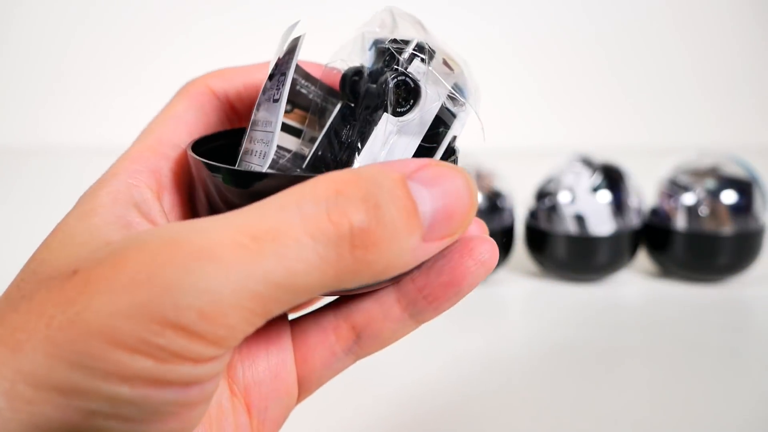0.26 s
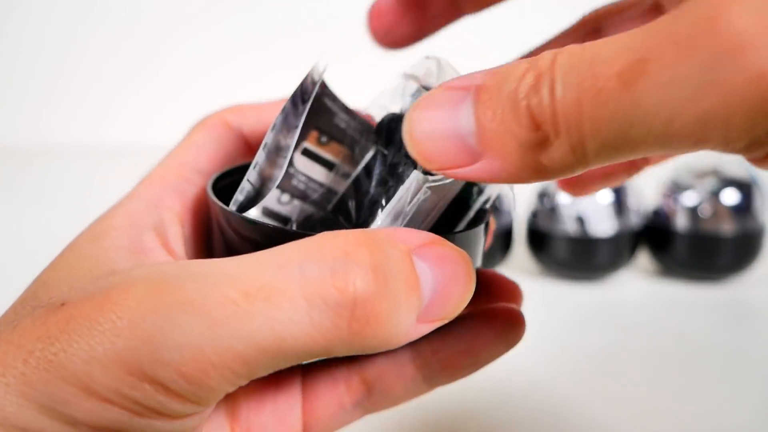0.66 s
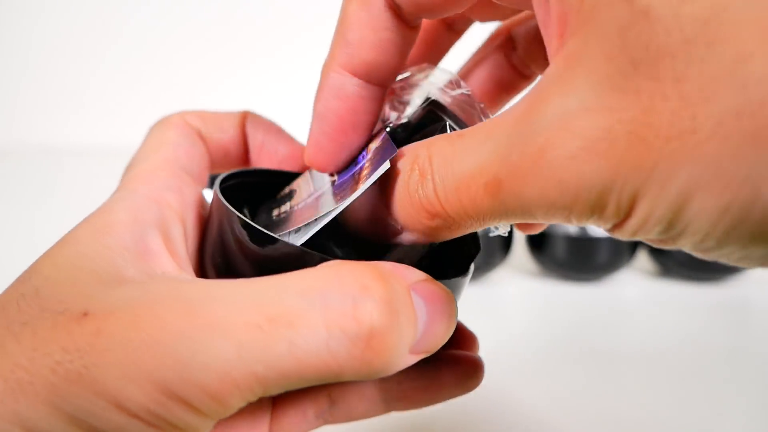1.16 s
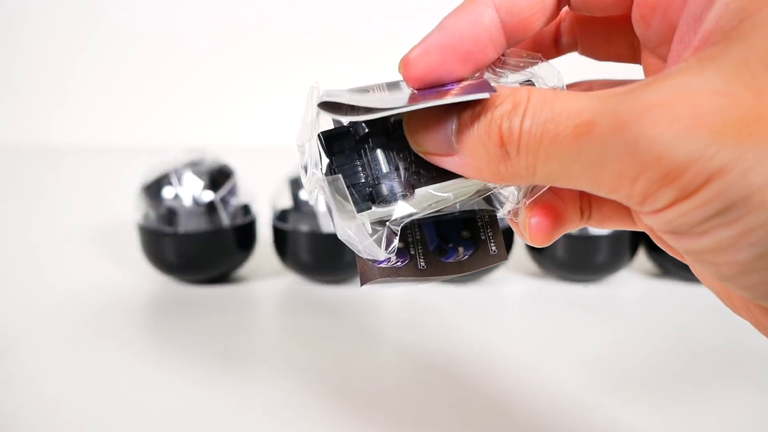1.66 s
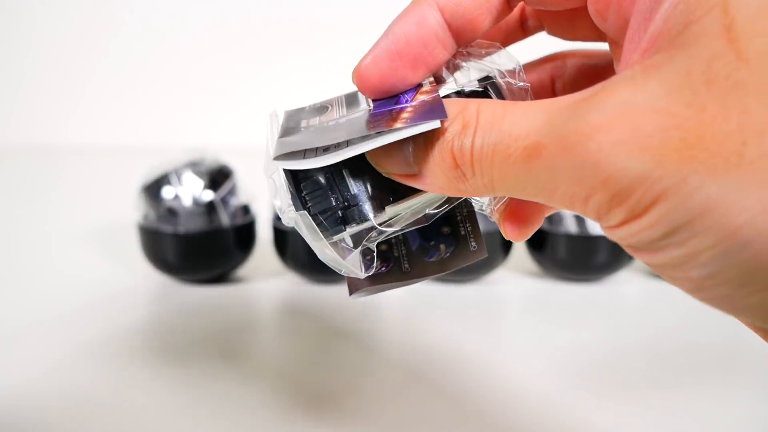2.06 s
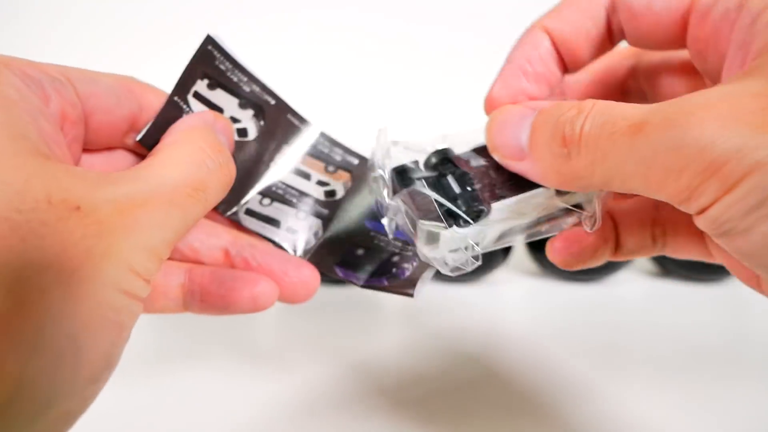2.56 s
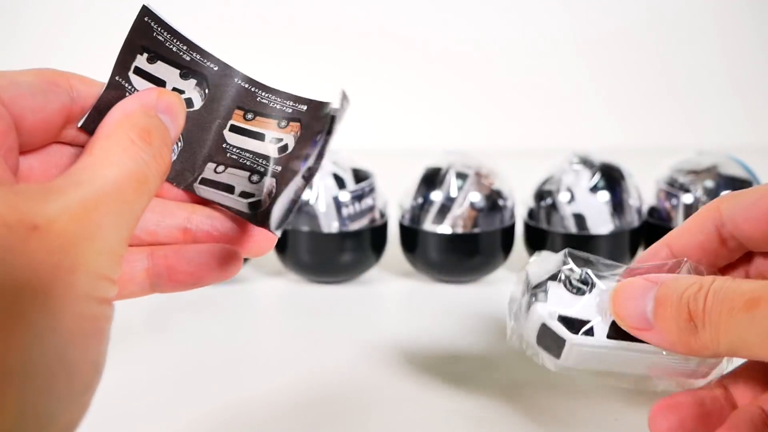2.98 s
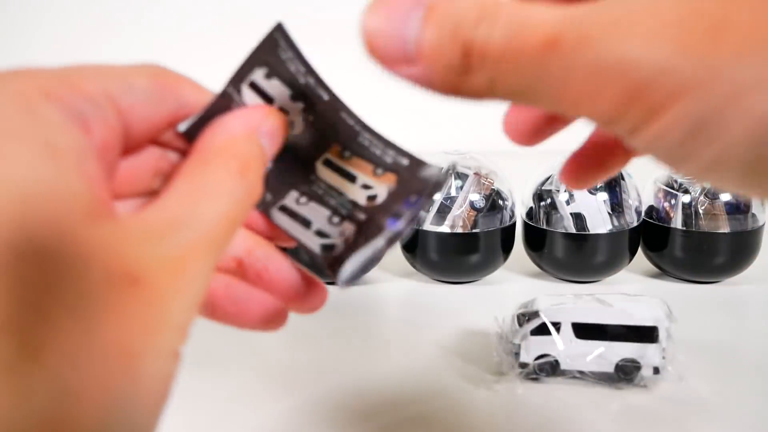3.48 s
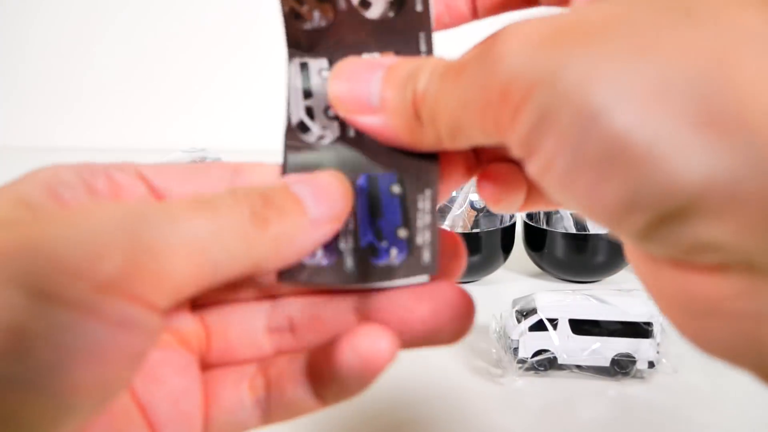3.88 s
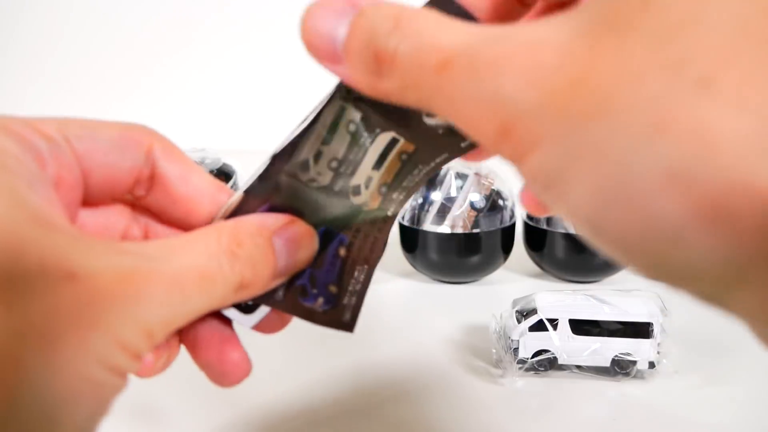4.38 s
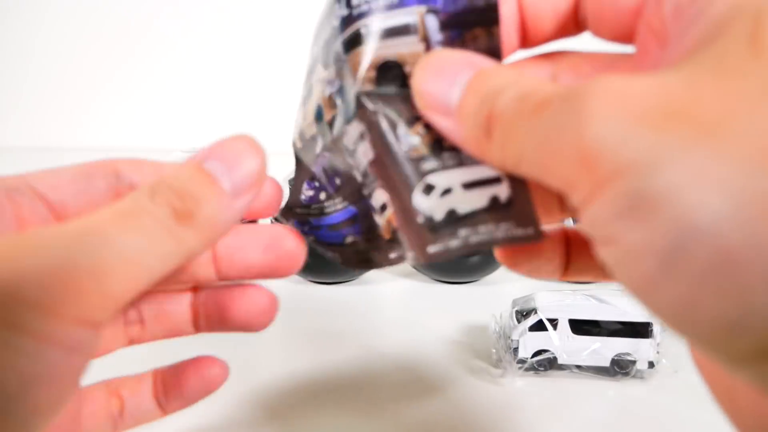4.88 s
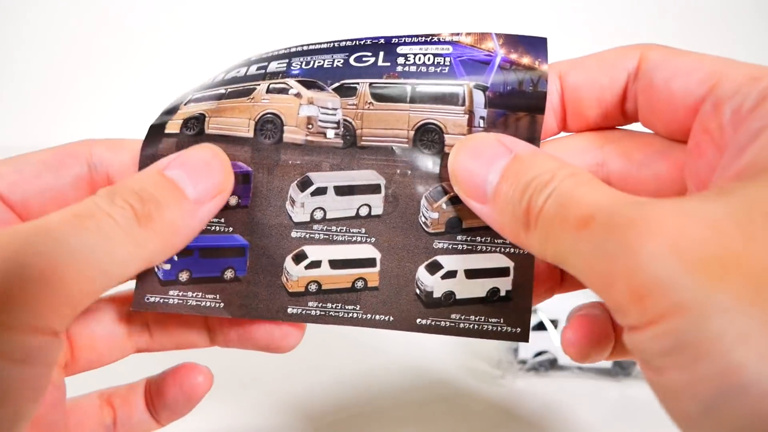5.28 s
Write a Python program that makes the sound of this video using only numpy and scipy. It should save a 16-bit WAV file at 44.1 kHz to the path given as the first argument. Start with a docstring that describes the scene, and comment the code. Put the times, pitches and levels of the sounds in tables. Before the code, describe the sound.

Hands unpack a plastic toy capsule close to the microphone in a small room, over a faint ventilation hum. After a light rustle, a thin lid lands on a table at about 0.3 seconds with a loud, sharp clack and a tiny bounce. From 0.6 to 1.4 seconds a wrapped toy scrapes and clicks against the inside of the cup. A few dry ticks of film follow. At 1.8 seconds the cup hits the table with a loud, hollow knock, then rocks softly until 2.2. From 2.3 to 3.7 seconds plastic wrap crinkles brightly and unevenly, with a few tiny finger squeaks and the first paper snaps. From 3.8 seconds a folded leaflet slides over skin and cracks at its creases, sharply at 4.0 and most busily around 4.7 to 5.0. It flaps open with low puffs of air, snapping lightly until about 5.6 seconds.

```python
"""A plastic lid clacks down on a table as a toy capsule is unpacked, close up in a small room.
The wrapped toy scrapes and knocks its way out of the cup, and the cup knocks on the table and rocks.
Then the plastic wrap crinkles, and a folded paper leaflet slides, snaps and flaps open.
Lid and cup ring as hard shells; creases flip with a tick and shake the panel around them;
sliding is a swarm of tiny slips. Ventilation hums faintly underneath."""
import sys
import numpy as np
from scipy import signal
from scipy.fft import rfft, irfft, next_fast_len
from scipy.io import wavfile
from scipy.ndimage import map_coordinates

SR = 44100
rng = np.random.default_rng(int(sys.argv[2]) if len(sys.argv) > 2 else 0)


def to_wav(sig):
    """Store sig (one row per channel, or 1-D mono) as 16-bit WAV at the path in sys.argv[1].

    Samples outside -1..1 are clipped; the rate is SR.
    """
    pcm = np.clip(np.atleast_2d(sig), -1, 1) * 32767
    pcm = np.round(pcm).astype(np.int16)
    wavfile.write(sys.argv[1], SR, pcm.T)  # frames by channels


N = 244314
WRAP_START_S, PAPER_START_S, END_S = 2.26, 3.81, 5.6


def amp(db):
    """Decibels to gain."""
    return 10 ** (np.asarray(db) / 20)


def unit(x):
    """Scale to rms 1."""
    return x / np.sqrt(np.mean(x ** 2) + 1e-20)


def burst(x):
    """Scale each row to the energy of one millisecond at rms 1."""
    return x * np.sqrt(SR / 1000 / (np.sum(x ** 2, axis=-1, keepdims=True) + 1e-20))


def along(points, hz):
    """Read (Hz, value) points on a log frequency axis."""
    point_hz, values = np.transpose(points)
    return np.interp(np.log(hz + 1), np.log(point_hz + 1), values)


def envelope(times, values):
    """Join timed points into one value per sample."""
    return np.interp(np.arange(N) / SR, times, values)


def wobble(rate, n):
    """A smooth random curve of n samples, rate knots a second."""
    knots = rng.standard_normal(int(n * rate / SR) + 4)
    return map_coordinates(knots, [np.arange(n) * rate / SR])


def filtered(x, response):
    """Filter x by a complex response of frequency."""
    n = x.shape[-1]
    size = next_fast_len(n + min(n, SR // 4), True)
    return irfft(rfft(x, size) * response(np.fft.rfftfreq(size, 1 / SR)), size)[..., :n]


def coloured(x, colour, size=1024):
    """Minimum-phase filter with a (Hz, dB) colour: nothing rings ahead of an attack."""
    cepstrum = irfft(np.log(amp(along(colour, np.fft.rfftfreq(size, 1 / SR)))))
    cepstrum[1:size // 2] *= 2
    cepstrum[size // 2 + 1:] = 0
    kernel = irfft(np.exp(rfft(cepstrum))).reshape((1,) * (x.ndim - 1) + (-1,))
    return signal.fftconvolve(x, kernel, axes=-1)[..., :x.shape[-1]]


def noise(colour):
    """Steady noise of rms 1 with a (Hz, dB) colour."""
    return unit(filtered(rng.standard_normal(N), lambda f: amp(along(colour, f))))


def resonance(f, hz, width_hz):
    """The response of one damped mode."""
    return 1j * f * width_hz / (hz * hz - f * f + 1j * f * width_hz)


def ring(rows, hz, width, order=1):
    """Each row excites its own mode; width is a fraction of the pitch."""
    return filtered(rows, lambda f: resonance(f, hz[:, None], width * hz[:, None]) ** order)


def jolts(t60, chatter, size=4096):
    """One row per contact: a sharp impulse and the chatter that dies after it."""
    t = np.arange(size) / SR
    tail = rng.standard_normal((len(t60), size)) * amp(-60 * t / np.maximum(t60, 1e-3)[:, None])
    return burst(1. * (t == 0)) + chatter * burst(tail)


def placed(times, sounds):
    """Sum rows of sound at their start times."""
    index = np.round(np.asarray(times) * SR).astype(int)[:, None] + np.arange(sounds.shape[1])
    return np.bincount(np.maximum(index, 0).ravel(), sounds.ravel(), N)[:N]


def room_tone():
    """The steady, bass-heavy noise of the quiet room."""
    # noise floor colour: freq_hz, level_db
    colour = [(20, 10), (60, -15), (84, -2), (105, -38), (130, 1), (200, -9.5), (500, -11.5), (1500, -19.5),
              (4000, -22), (9000, -20), (16000, -55)]
    return noise(colour)


def ventilation():
    """Low ventilation tones that waver in pitch and level."""
    # hum tones: pitch_hz, level_db
    tones = [(82, -62.5), (126, -61.5)]
    t = np.arange(N) / SR
    hum = np.zeros(N)
    for hz, db in tones:
        peak = np.sqrt(2) * amp(db + 1.4 * wobble(5.78, N))
        hum += peak * np.sin(2 * np.pi * hz * t + wobble(3.8, N))
    return hum


def room_reverb(x, size=8192):
    """The small room's short tail, drawn afresh for each block so that no fixed pitch rings."""
    # room decay: freq_hz, t60_s
    decay = [(150, 0.37), (500, 0.17), (1200, 0.21), (3000, 0.24), (8000, 0.23), (15000, 0.24)]
    blocks = np.pad(x, (0, -N % size)).reshape(-1, 1, size)
    hz, t, spectra = signal.stft(rng.standard_normal((len(blocks), 2, size)), SR, nperseg=256)
    spectra *= amp(-60 * t / along(decay, hz)[:, None])
    tail = signal.istft(spectra, SR, nperseg=256)[1][..., :size]
    tail *= np.clip(np.arange(size) / SR / .002 - 1, 0, 1)  # first reflections after 2 ms
    tail /= np.linalg.norm(tail, axis=-1, keepdims=True)
    wet = signal.fftconvolve(blocks, tail, axes=-1)
    starts = np.arange(len(blocks)) * size / SR
    return np.array([placed(starts, channel) for channel in wet.transpose(1, 0, 2)])


def stirred_air():
    """Hands and leaflet stir the air into a low rumble."""
    # air movement: time_s, level_db
    gusts = [(0.0, -52.5), (0.21, -62), (0.29, -44), (0.34, -58.5), (2.28, -54), (2.31, -51), (2.36, -51),
             (2.96, -61.5), (4.15, -46), (4.18, -49), (4.43, -60), (4.84, -34.5), (4.92, -48),
             (4.98, -29.5), (5.06, -60), (5.2, -35), (5.25, -49), (5.54, -33)]
    # rumble colour: freq_hz, level_db
    colour = [(10, -13), (35, -2), (70, 2.5), (130, -18), (250, -12.5), (600, -72)]
    times, db = np.transpose(gusts)
    return amp(envelope(times, db) - 1) * noise(colour)


def pushes(rows, width):
    """Soft, quickly damped pushes of air."""
    starts, db, hz, t60 = np.transpose(rows)
    push = ring(jolts(t60, chatter=0.9), hz, width, order=2)
    return placed(starts, amp(db)[:, None] * burst(push))


def bumps():
    """Table, toy and hands bump dully."""
    # thuds: start_s, level_db, pitch_hz, t60_s
    thuds = [(.288, -21, 128, 0.19), (1.12, -25, 465, 0.034), (2.3, -27.5, 58, 0.089)]
    return pushes(thuds, width=0.76)


def finger_strokes(release_db=26):
    """Body and hiss envelopes in dB: strokes swell as the fingers press and die as they ease off."""
    # finger moves: start_s, rise_s, fall_s, body_db, hiss_db
    strokes = [(-0.03, 0.11, 0.099, -40, -46), (0.11, .03, 0.035, -39, -43.5),
               (0.34, 0.059, 0.06, -49, -62), (0.55, 0.068, 0.021, -45.5, -47),
               (0.708, 0.063, 0.27, -29.5, -30.5), (0.88, 0.085, 0.06, -28, -31),
               (1.078, 0.028, 0.096, -22, -24), (1.141, 0.097, 0.24, -30, -37.5), (1.6, 0.1, .15, -74, -55),
               (2.04, 0.038, 0.17, -45, -46.5), (2.282, 0.013, 0.11, -38, -32),
               (2.335, 0.069, 0.16, -38, -32), (2.41, 0.077, 0.1, -38.5, -31),
               (2.583, 0.012, 0.12, -29, -25.5), (2.69, 0.048, 0.22, -37.5, -33.5),
               (2.86, 0.035, 0.39, -40, -37.5), (3.035, 0.05, 0.088, -35.5, -29),
               (3.13, 0.041, 0.13, -31.5, -30), (3.281, 0.05, 0.15, -36, -33),
               (3.455, 0.049, 0.12, -30.5, -27.5), (3.53, 0.034, 0.16, -37, -35),
               (3.6, 0.068, 0.18, -41.5, -34.5), (3.835, 0.023, 0.056, -43, -35.5),
               (3.93, 0.17, 0.22, -41.5, -36), (4.11, 0.075, 0.23, -33.5, -27.5),
               (4.33, 0.084, 0.02, -35.5, -26.5), (4.508, 0.026, 0.088, -43, -31),
               (4.56, 0.1, 0.18, -36, -31.5), (4.75, 0.027, 0.6, -42, -38),
               (4.92, 0.047, 0.059, -30.5, -33), (5.148, 0.01, 0.075, -35.5, -34),
               (5.255, 0.069, 0.6, -40, -42), (5.39, 0.14, 0.55, -51, -42)]
    t = np.arange(0, END_S, .001)
    body, hiss = amp(-69.5) ** 2, amp(-69) ** 2  # fingers holding still rustle faintly
    for start, rise, fall, body_db, hiss_db in strokes:
        press = np.clip((t - start) / rise, 0, 1) ** 0.67
        lift = np.clip((t - start - rise) / fall, 0, 10) ** 1.05  # steepens as the fingers lift off
        power = (press * amp(-release_db * lift)) ** 2
        body += power * amp(body_db) ** 2
        hiss += power * amp(hiss_db) ** 2
    return np.array([envelope(t, 10 * np.log10(band)) for band in (body, hiss)])


def bending(x, depth_db):
    """The sheet's resonances come and go as it bends."""
    spectra = signal.stft(x, nperseg=512)[2]
    patch = np.outer(np.hanning(13), np.hanning(15))
    drift = signal.fftconvolve(rng.standard_normal(spectra.shape), patch, "same")
    return signal.istft(spectra * amp(depth_db * unit(drift)), nperseg=512)[1][:len(x)]


def friction(slide_db, start_s, end_s, colours, slips_per_s, spread_db, trims_db):
    """Countless tiny slips over a smooth friction noise; each slip sounds in both body and hiss."""
    first, last = round(start_s * SR), min(round(end_s * SR), N)
    n = last - first
    slipping = rng.random(n) < slips_per_s / SR
    slips = slipping * amp(spread_db * np.minimum(rng.standard_normal(n), 2))
    fade = amp(-60 / SR / .004)  # each slip chatters for 4 ms
    chatter = unit(np.sqrt(signal.lfilter([1], [1, -fade ** 2], slips ** 2)))
    grip = (chatter + .4) * amp(1.8 * wobble(55, n))  # slips come in clumps
    sound = np.zeros(n)
    for level_db, colour, trim_db in zip(slide_db[:, first:last], colours, trims_db):
        drive = bending(grip * rng.standard_normal(n), depth_db=2.7)
        sound += amp(level_db + trim_db) * unit(coloured(drive, colour))
    return np.pad(sound, (first, N - last))


def cup_scrape(slide_db):
    """The wrap drags along the inside of the cup."""
    # hollow body of the scrape: freq_hz, level_db
    body = [(150, -19), (400, -7), (800, -7.5), (1150, -13), (1550, 1.5), (1800, -0.5), (2200, -8.5),
            (3000, -12), (5000, -31)]
    # its hiss: freq_hz, level_db
    hiss = [(1500, -30), (2900, 0), (4300, -1), (6900, -6), (8400, -4), (10600, -13), (13600, -9),
            (16000, -19)]
    return friction(slide_db, 0, WRAP_START_S, (body, hiss),
                    slips_per_s=1100, spread_db=4, trims_db=(-4.5, -2))


def wrap_rustle(slide_db):
    """The wrap slides in the hand with uneven, grainy slips."""
    # body of the rustle: freq_hz, level_db
    body = [(120, -4), (350, 0.5), (700, 7), (1200, 0.5), (1950, 5.5), (2800, -7), (5000, -17)]
    # its hiss: freq_hz, level_db
    hiss = [(1500, -25), (3000, -2), (4500, 0), (6500, -1), (8000, 0), (10500, -12), (13200, -12),
            (16000, -22)]
    return friction(slide_db, WRAP_START_S, PAPER_START_S, (body, hiss),
                    slips_per_s=1000, spread_db=5.5, trims_db=(1, -1))


def paper_swish(slide_db):
    """Paper slides over skin with fine, even slips."""
    # body of the swish: freq_hz, level_db
    body = [(100, -5), (280, -6.5), (500, -3.5), (720, -0.5), (1100, -13), (1600, -8), (2800, -11.5),
            (5000, -31)]
    # its hiss: freq_hz, level_db
    hiss = [(1500, -28), (3000, -2), (4300, 0), (5800, -4), (8400, -4), (10800, -12), (13700, -9),
            (16000, -18)]
    return friction(slide_db, PAPER_START_S, END_S, (body, hiss),
                    slips_per_s=1400, spread_db=1.5, trims_db=(-2, -3.5))


def finger_squeaks(size=4096):
    """Fingers stick and slip on the glossy sheet: a narrow resonance swells and fades."""
    # squeaks: start_s, length_s, pitch_hz, level_db
    squeaks = [(2.295, .03, 3550, -32), (2.33, .04, 2080, -39), (2.59, .035, 1950, -26),
               (3.54, .07, 1960, -35)]
    starts, length, hz, db = np.transpose(squeaks)
    tone = ring(rng.standard_normal((len(starts), size)), hz, width=0.07, order=2)
    tone /= tone.std(axis=1, keepdims=True)
    swell = np.sin(np.pi * np.clip(np.arange(size) / SR / length[:, None], 0, 1))
    return placed(starts, amp(db)[:, None] * swell * tone)


def snaps(starts, tick_db, tick_hz, panel_db, panel_hz, t60, tick_width, flip_t60, panel_width=1.0):
    """A crease flips with a bright tick and shakes the wider panel around it."""
    # how the sheet radiates a tick: freq_hz, gain_db
    radiation = [(200, -24), (1500, -5), (3000, 4.5), (5000, 4), (6500, 0.5), (7900, 5), (10500, -5.5),
                 (13200, -2), (16000, -4.5)]
    flip = burst(jolts(np.full(len(starts), flip_t60), chatter=5.2))
    rattle = 0.52 * burst(jolts(t60, chatter=14))
    tick = burst(coloured(ring(flip + rattle, tick_hz, tick_width), radiation))
    panel = burst(ring(jolts(0.91 * t60, chatter=1.0), panel_hz, panel_width, order=2))
    return placed(starts, amp(tick_db)[:, None] * tick + amp(panel_db)[:, None] * panel)


def crackles(slide_db, count=220, spread_db=4.5, scatter_oct=0.4):
    """Small creases give way at random, following the level of the sliding."""
    at = rng.integers(N, size=count)
    strength, tick_detune, panel_detune = rng.standard_normal((count, 3)).T
    panel_db, tick_db = slide_db[:, at] + 1 + spread_db * np.minimum(strength, 1)
    tick_hz = 5800 * 2 ** (scatter_oct * np.clip(tick_detune, -2, 2))
    panel_hz = 1450 * 2 ** (scatter_oct * panel_detune)
    return snaps(at / SR, tick_db, tick_hz, panel_db, panel_hz, np.full(count, 0.036),
                 tick_width=0.5, flip_t60=0.0036)


def shell(hits, modes, t60, chatter):
    """Blows on a hard plastic shell ring its modes; a soft contact leaves the high ones still."""
    starts, db, hardness_hz = np.transpose(hits)

    def response(f):
        """The shell's modes, dulled by the softness of each contact."""
        body = sum(amp(level) * resonance(f, hz, width) for hz, width, level in modes)
        return body / (1 + 1j * f / hardness_hz[:, None]) ** 2

    blows = jolts(np.full(len(starts), t60), chatter)
    return placed(starts, amp(db)[:, None] * burst(filtered(blows, response)))


def lid_clack():
    """The thin lid lands on the table and bounces."""
    # contacts: start_s, level_db, hardness_hz
    hits = [(.2772, -2.5, 14000), (.2812, -17, 12000), (.2906, -20, 6000), (.2955, -36, 12000)]
    # lid modes: pitch_hz, width_hz, level_db
    modes = [(444, 98, 1), (840, 560, 6), (1310, 560, 4.5), (3000, 2100, -4.5), (3920, 1700, 3.5),
             (6000, 250, 4.5), (8300, 730, 5), (9600, 450, -4), (13300, 2500, -28)]
    return shell(hits, modes, t60=0.0068, chatter=0.77)


def cup_knocks():
    """The cup touches the table and rocks."""
    # contacts: start_s, level_db, hardness_hz
    hits = [(1.418, -29.5, 1200), (1.812, -1.5, 6400), (2.001, -32, 1080), (2.09, -19.5, 1800),
            (2.217, -21, 1110)]
    # modes of the cup on the table: pitch_hz, width_hz, level_db
    modes = [(80, 32, -23), (520, 150, 12.5), (690, 140, 10), (768, 99, 27.5), (1045, 85, 22.5),
             (1440, 170, -36), (2000, 300, -34), (7500, 10400, 5)]
    return shell(hits, modes, t60=0.0077, chatter=0.27)


def toy_in_cup(wall_hz=1490, t60_s=0.018):
    """Every knock of the wrapped toy rings the same wall of the cup, damped by the hand."""
    # knocks: start_s, tick_db, tick_hz, wall_db
    knocks = [(0.057, -31, 6070, -36), (0.1964, -47, 3400, -40.5), (0.6059, -29.5, 3380, -25.5),
              (0.701, -36, 4200, -26.5), (0.729, -30, 3380, -30), (0.8256, -16, 3700, -11),
              (0.9386, -14, 5500, -19), (0.9563, -20.5, 4170, -26), (0.9648, -14.5, 7500, -13),
              (0.9963, -22, 6070, -21), (1.022, -36, 5240, -27), (1.1017, -20, 5130, -15),
              (1.124, -20.5, 4370, -21), (1.158, -23.5, 6000, -33), (1.168, -20.5, 5240, -11.5),
              (1.1965, -11.5, 6900, -15.5), (1.2631, -23.5, 3650, -15.5), (1.291, -27, 8500, -23)]
    starts, tick_db, tick_hz, wall_db = np.transpose(knocks)
    each = np.ones(len(starts))
    return snaps(starts, tick_db + 2, tick_hz, wall_db, wall_hz * each, t60_s * each,
                 tick_width=0.82, flip_t60=0.006, panel_width=0.42)


def wrap_crinkle(facet_hz=1806, scatter_oct=0.091, medium_shake_db=-21.5):
    """Thin film ticks drily when barely moved and rattles on when a whole facet is shaken."""
    # buckling creases: start_s, tick_db, tick_hz, panel_db
    creases = [(1.1768, -18, 8600, -27), (1.3377, -30.5, 4460, -35), (1.359, -31, 9100, -42),
               (1.4417, -22, 9650, -62), (1.538, -29, 4600, -38), (1.7112, -22, 4180, -32.5),
               (1.8043, -18, 9000, -54), (1.945, -29.5, 5160, -34), (1.973, -25, 10300, -50),
               (2.0572, -14.5, 8800, -31), (2.0889, -34, 4430, -19.5), (2.1354, -21, 5900, -46),
               (2.1629, -22.5, 5800, -29), (2.2016, -22.5, 9700, -48), (2.3086, -17, 3270, -16.5),
               (2.378, -14.5, 4860, -26), (2.406, -18, 8300, -32), (2.4354, -24, 5800, -20),
               (2.4495, -9, 7300, -13), (2.4847, -12.5, 4960, -15), (2.5443, -11, 8740, -21.5),
               (2.5866, -10.5, 6000, -14), (2.5988, -36, 4640, -18), (2.6217, -19, 5500, -36),
               (2.625, -9.5, 8400, -15.5), (2.6363, -14.5, 7200, -21.5), (2.7015, -14, 5800, -21.5),
               (2.7347, -14.5, 7600, -30), (2.8122, -5.5, 6500, -34), (2.8376, -15, 6960, -25),
               (2.8834, -6, 8300, -16.5), (2.8901, -29, 8000, -15), (2.951, -5.5, 9600, -20.5),
               (2.993, -25.5, 6500, -30), (3.0074, -28.5, 7900, -27.5), (3.0422, -6.5, 7600, -11),
               (3.072, -16.5, 5470, -22), (3.087, -16, 6000, -19), (3.1715, -7.5, 6050, -15.5),
               (3.2691, -18.5, 6940, -30.5), (3.3046, -25, 3070, -14.5), (3.336, -13.5, 7800, -12.5),
               (3.3752, -17, 6700, -15.5), (3.418, -16, 7500, -26.5), (3.4754, -19, 4800, -18.5),
               (3.4942, -16, 4800, -13), (3.5209, -14, 7500, -12.5), (3.6169, -18, 7800, -22)]
    starts, tick_db, tick_hz, panel_db = np.transpose(creases)
    panel_hz = facet_hz * 2 ** (scatter_oct * rng.standard_normal(len(starts)))  # facets vary in size
    shake_db = panel_db - medium_shake_db
    t60 = 0.018 * amp(0.13 * shake_db)
    flip_t60 = 0.0035 * amp(0.23 * shake_db)  # a small crease flips quicker
    return snaps(starts, tick_db + 2, tick_hz, panel_db, panel_hz, t60,
                 tick_width=0.42, flip_t60=flip_t60)


def leaflet(flop_t60_s=0.051):
    """Stiff paper snaps at its folds; large panels sound lower and longer, and flop over."""
    # folds snapping through: start_s, tick_db, tick_hz, panel_db, panel_hz
    folds = [(2.7892, -20.5, 8160, -16, 710), (3.31, -15, 8650, -15.5, 690),
             (3.6955, -42, 3500, -16.5, 1120), (3.7624, -21.5, 3000, -22.5, 756),
             (3.9015, -25.5, 5140, -25.5, 770), (3.9256, -20.5, 3900, -26.5, 686),
             (3.943, -22, 8300, -25, 795), (3.9544, -15.5, 7500, -28, 2840),
             (4.0331, -5.5, 5830, -6.5, 1810), (4.126, -19, 4400, -22, 640),
             (4.185, -11.5, 3800, -18, 1490), (4.6984, -42, 3480, -11.5, 2220),
             (4.7123, -45, 3300, -6.5, 2600), (4.753, -14, 3520, -13, 734), (4.8361, -39, 3700, -29, 2630),
             (4.8517, -19.5, 5000, -24, 724), (4.8564, -16, 3300, -7, 720), (4.8746, -3, 7040, -18, 1440),
             (4.9604, -10, 4500, -19.5, 790), (4.9888, -22, 5200, -16.5, 790),
             (5.1532, -30, 5200, -23, 690), (5.1877, -16.5, 3380, -13.5, 700),
             (5.1984, -27, 3430, -19, 835), (5.2583, -23, 3280, -11, 2770), (5.3633, -38, 3200, -22.5, 700),
             (5.4002, -12, 5000, -18, 1770), (5.4125, -13.5, 3840, -17.5, 960),
             (5.4719, -33, 3380, -24, 700), (5.5141, -36, 3000, -17.5, 480),
             (5.524, -22.5, 3000, -12, 1480)]
    # flopping panels push air: start_s, level_db, pitch_hz
    flops = [(2.485, -16, 317), (3.473, -18, 480), (3.665, -29.5, 152), (4.187, -21.5, 125),
             (4.712, -12, 490), (4.753, -27, 148), (4.836, -21.5, 80), (4.855, -28, 198),
             (4.877, -19.5, 520), (4.956, -22, 91), (5.187, -24, 200), (5.2, -24.5, 103), (5.258, -20, 470),
             (5.403, -17, 420), (5.472, -22, 322), (5.524, -14.5, 245)]
    starts, tick_db, tick_hz, panel_db, panel_hz = np.transpose(folds)
    t60 = 0.037 * (1000 / panel_hz) ** 0.79
    cracks = snaps(starts, tick_db + 2, tick_hz, panel_db, panel_hz, t60,
                   tick_width=0.84, flip_t60=0.0014)
    return cracks + pushes([(*flop, flop_t60_s) for flop in flops], width=1.54)


def scene():
    """Hands work right at the microphone; lid and cup land farther off, with more room. Nearly mono."""
    # faint stereo spread, strongest in the treble: freq_hz, side_to_mid_db
    width = [(300, -32.5), (3000, -38.5), (12000, -23.5)]
    lid = amp(2.5) * lid_clack()
    cup = amp(-2) * cup_knocks()
    slide_db = finger_strokes()
    near = toy_in_cup() + wrap_crinkle() + leaflet() + crackles(slide_db) + finger_squeaks()
    near += cup_scrape(slide_db) + wrap_rustle(slide_db) + paper_swish(slide_db)
    bed = stirred_air() + amp(-54) * room_tone() + ventilation() + bumps()
    wet_mid, wet_side = room_reverb(amp(-13) * near + amp(-9.5) * lid + amp(-8) * cup)
    mid = near + lid + cup + bed + wet_mid
    spread = filtered(near, lambda f: 1j * amp(along(width, f)))
    side = amp(-31) * wet_side + spread + amp(-67.5) * room_tone()
    return np.array([mid + side, mid - side])


def record(dry):
    """The sharpest snaps overload the input; nothing passes above the band limit."""
    ceiling, top_hz = 0.95, 15900
    clipped = dry / (1 + np.abs(dry / ceiling) ** 6) ** (1 / 6)
    return filtered(clipped, lambda f: 1 / np.sqrt(1 + (f / top_hz) ** 160))


dry = scene()
out = record(dry)
to_wav(out)
```